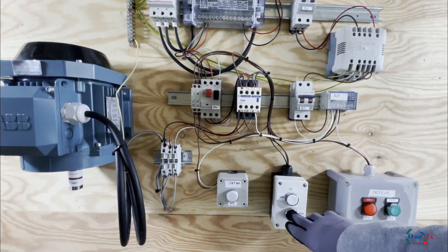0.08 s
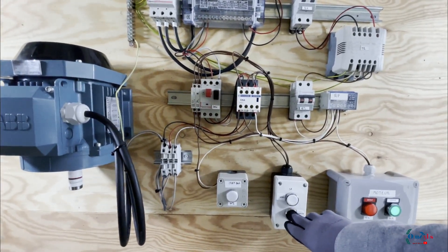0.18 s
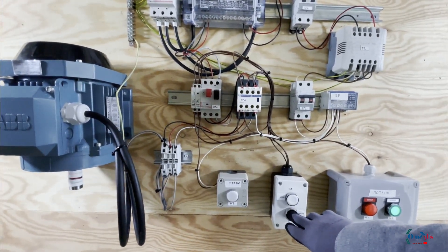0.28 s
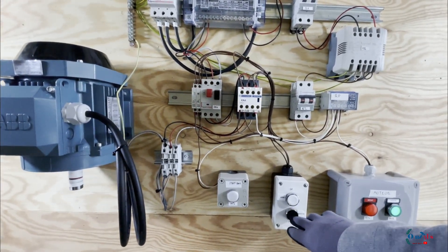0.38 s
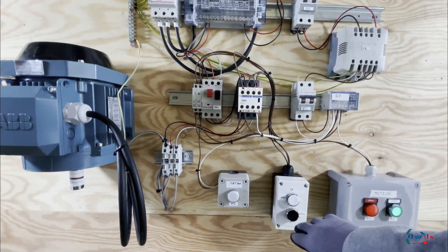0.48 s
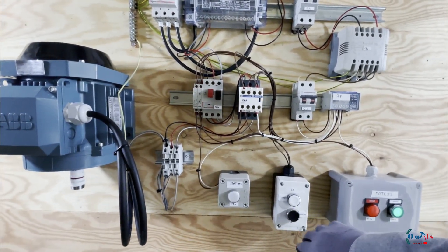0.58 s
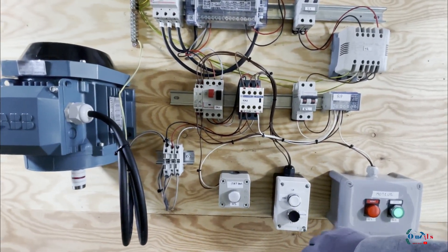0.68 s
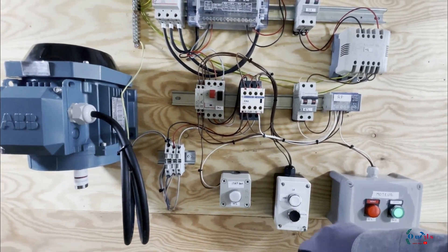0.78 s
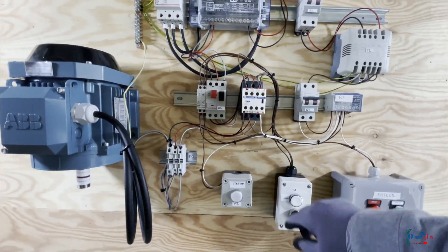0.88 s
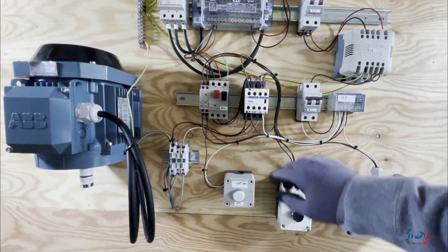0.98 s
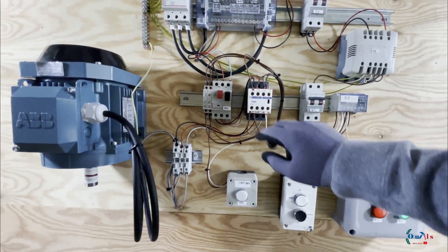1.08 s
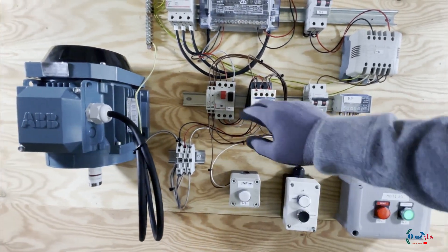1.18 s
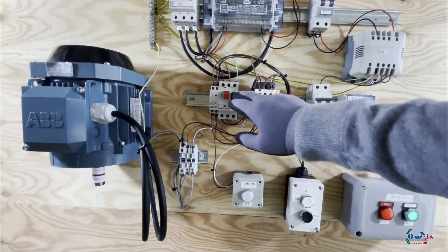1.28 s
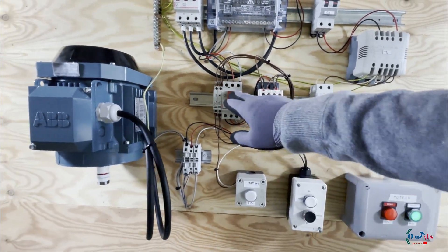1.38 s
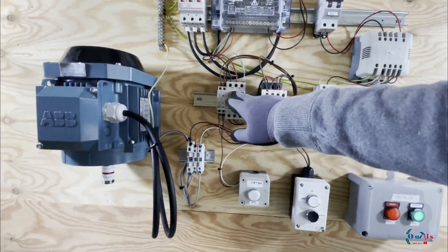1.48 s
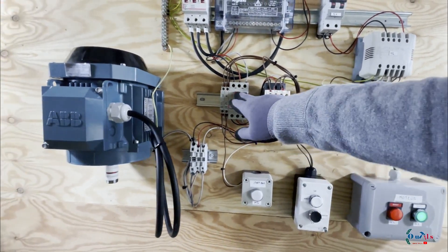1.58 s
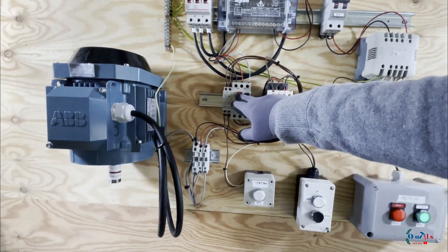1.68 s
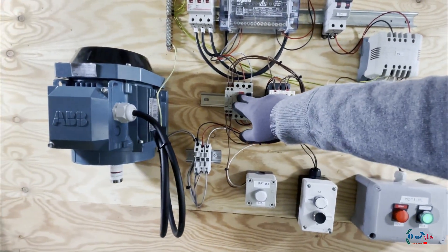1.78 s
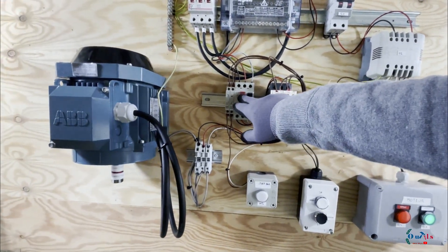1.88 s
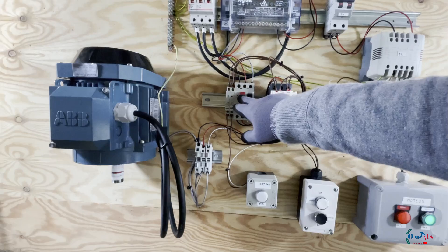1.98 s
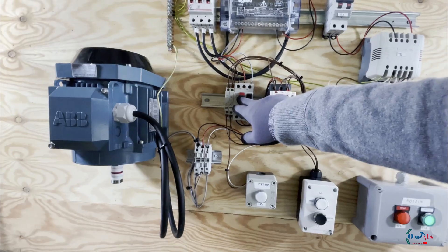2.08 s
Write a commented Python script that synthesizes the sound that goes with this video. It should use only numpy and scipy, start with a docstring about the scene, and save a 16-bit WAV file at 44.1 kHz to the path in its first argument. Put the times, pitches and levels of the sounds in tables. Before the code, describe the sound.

Close up in a small workshop, an electric motor is switched on: a faint button tick, a loud ringing contactor clack, a brief rattling shudder on a wooden panel, then a steady hum with a whine and airy hiss.

```python
"""Small workshop, close to a four-pole induction motor on a plywood panel. A button ticks, a contactor
clacks shut and its springs ring on. The inrush makes the motor shudder and rattle on the panel.
In a quarter second it is at speed and runs on with a low hum, a slot whine that beats once a turn,
and the hiss of its fan and bearings."""
import sys
import numpy as np
from scipy import signal
from scipy.fft import rfft, irfft
from scipy.io import wavfile
from scipy.ndimage import uniform_filter1d

SR = 44100
rng = np.random.default_rng(int(sys.argv[2]) if len(sys.argv) > 2 else 0)


def dump(signal):
    """Clip the signal to [-1, 1] and save it as 16-bit WAV at the path in sys.argv[1]."""
    limited = np.clip(np.atleast_2d(signal).T, -1, 1)
    pcm = np.round(limited * 32767).astype(np.int16)
    wavfile.write(sys.argv[1], SR, pcm)


N = 94815

MAINS_HZ, SHAFT_HZ = 50, 24.975
POWER_ON_S, RUN_UP_S = .23, .215
AT_SPEED_S = POWER_ON_S + RUN_UP_S

# Hum and slot whine. Each entry: a multiple of the shaft rate.
HUM_ORDERS = [3, 4, 5, 7, 8, 9, 11, 12]
WHINE_ORDERS = [30, 31, 34, 35, 36, 38, 56, 70, 130, 178]
# One tone per order. Each row: settled level in dB, left minus right in dB, left lead in radians.
HUM_TONES = [(-50, -1, 0), (-34.5, 1, 0), (-39, 4, .3), (-60.5, -5, 0.13), (-42, 4.5, 0.35),
             (-59.5, 6, 0.33), (-47.5, -3, 0.75), (-43.5, -6, 0.51)]
WHINE_TONES = [(-40.5, 6.5, -4), (-52, 17, 1.5), (-29, -6, -1.5), (-39, -7, 0), (-52, 9, 1),
               (-43, 8.5, -3.2), (-49.5, 4, 1.5), (-43, 1, -1.4), (-48, 2, -1.6), (-57.5, 23, 0.4)]
# End shield resonances. Each row: centre in Hz, half-width in Hz, level in dB, left minus right in dB.
BEARING_BANDS = [(1383, 53, -46, 12.5), (1884, 120, -47.5, -5.5), (2055, 50, -52, -4.5),
                 (3320, 88, -50, 14.5), (3525, 74, -48.5, 14), (3880, 110, -44.5, 2.5),
                 (4156, 250, -47.5, 5), (7200, 76, -57.5, 5)]
# Armature and contact bounces; jolts on the panel. Each row: start in seconds, relative level in dB.
CONTACT_BOUNCES = [(0.2161, -15.5), (.2202, -1), (.2215, 1), (.2243, -3.5), (.2257, 3.5), (.2277, -1)]
PANEL_JOLTS = [(.2155, -15.5), (.2335, -11.5), (.3245, -10), (.3395, -12), (.353, -14), (.3685, -11.5),
               (.3955, -8.5), (.4255, -9.5), (.4375, -11), (.456, -15), (.4905, -10)]
# Struck parts. Each row: frequency in Hz, relative level in dB, T60 in seconds.
CONTACTOR_MODES = [(2100, -13, 0.035), (2279, -14.5, 0.038), (2985, -17.5, 0.022), (3770, -14.5, 0.015),
                   (4840, -9, 0.072), (5470, -15, 0.027), (5780, -6, 0.029), (5870, -13.5, 0.03),
                   (7660, -12, .03), (7870, -14, 0.034), (9400, -19, 0.015), (11270, -8, 0.011)]
SPRING_MODES = [(3950, -45, 0.65), (4570, -43, .6), (5400, -37, .4), (5400, -45, 0.66), (5720, -35, 0.54),
                (6020, -34, 0.59), (7000, -39, 0.78), (7000, -36, 0.78), (7600, -29.5, 0.48),
                (7540, -33.5, .7), (8630, -35, 0.68)]
PANEL_MODES = [(66.1, -12, 0.37), (107, -15, 0.061), (153.7, 0, 0.18), (196, -4, 0.028), (251, -8, 0.146),
               (314, -10, 0.24), (326.7, -17.5, 0.29), (394, -25, 0.017)]
# Shudder strength. Each row: time in seconds, gain in dB.
SHUDDER_ENVELOPE = [(.2, -29.5), (.235, 1.5), (.29, -11), (.34, 4.5), (.42, 3.5), (.5, -3.5), (.525, -12),
                    (.62, -14), (.72, -19.5), (1.05, -27), (1.3, -22)]
# Housing rattles. Each row: peak time in seconds, Gaussian sigma in seconds, centre in Hz,
# half-width in Hz, level in dB, left minus right in dB.
RATTLE_BURSTS = [(0.267, 0.022, 805, 147, -24.5, 8), (0.355, 0.0086, 600, 556, -19, -3),
                 (0.386, 0.0083, 740, 463, -20.5, 4), (0.375, 0.049, 3330, 4070, -29, 4),
                 (0.403, 0.0042, 11000, 910, -33.5, -4), (0.422, 0.0029, 6050, 4000, -25.5, 3)]
# Noise spectra, before their envelopes. Each row: frequency in Hz, left in dB/Hz, right in dB/Hz,
# left-right correlation from -1 to 1.
RUSH_SPECTRUM = [(30, -73, -81, 0.88), (53.5, -54.5, -56.5, 1), (150, -63, -60.5, 0.97),
                 (312, -60.5, -64.5, 1), (479, -69.5, -68.5, 0.074), (736, -55.5, -70.5, 0.41),
                 (1117, -67, -66, 0.59), (1470, -61, -70.5, 0.82), (1640, -60.5, -61.5, 0.8),
                 (1980, -61, -63, 1), (2420, -70, -74.5, 0.87), (3200, -69.5, -72.5, 0.1),
                 (3980, -68.5, -74, 0.4), (5170, -71.5, -81, 0.27), (6450, -77.5, -87, 0.5),
                 (7800, -81.5, -84.5, 0.23), (9000, -76.5, -76.5, 0.15), (9600, -80, -81, 0.14),
                 (9350, -105, -105, 0.24), (10700, -101, -101, 0.54)]  # fan and bearings
CRACK_SPECTRUM = [(400, -67, -60, 1), (1150, -70, -71, .5), (2095, -45, -40.5, 1), (2540, -65, -53.5, 0),
                  (3440, -57, -52, 0.041), (4200, -57, -57, 0.57), (6000, -41, -39, 0), (6860, -46, -56, 0),
                  (7600, -37, -39, 0), (9860, -53, -46.5, 0.2), (12860, -59, -54, 0.42),
                  (15600, -67, -74, 0)]  # each contact bounce
TAIL_SPECTRUM = [(506, -59, -73, 0.045), (1390, -65, -77, 0.025), (2170, -60, -65, 0.049),
                 (2800, -72, -71, 0), (3700, -68, -69, 0), (4700, -58.5, -65, 0.3),
                 (6340, -54.5, -70, 0.074), (6370, -61, -79, 0.21), (7700, -56, -71, 0.16),
                 (8950, -58.5, -60, .2), (9800, -83, -82, .3), (12200, -59.5, -58, 0.026)]  # clack ringing in springs and room
RUMBLE_SPECTRUM = [(30, -66, -68, 0.38), (59, -38, -42.5, 1), (120, -36, -35.5, 0.96), (280, -46, -45.5, 1),
                   (450, -61, -56.5, 0.04), (930, -78, -66, 0.68)]  # shuddering motor
BUTTON_SPECTRUM = [(1000, -80, -89, .3), (2000, -67, -65, .3), (3500, -70, -81, .3), (5200, -74, -80, .3),
                   (7000, -95, -99, .3)]
WORKSHOP_SPECTRUM = [(29.6, -80, -59, 1.0), (56, -58.5, -56.5, 1.0), (140, -57.5, -59, 0.84),
                     (250, -73, -72.5, 0.98), (580, -69, -72, -0.96), (1170, -82.5, -90.5, -0.2),
                     (1890, -70.5, -75, -0.0093), (2500, -88.5, -93.5, 0.4), (3720, -75.5, -81, 0.72),
                     (5250, -90.5, -101.5, -0.32), (7200, -95.5, -100, 1), (8850, -87.5, -88, -0.57)]


def motor():
    """The shaft runs up evenly; hum, slot whine and rush follow its speed."""
    speed = np.clip(since(POWER_ON_S) / RUN_UP_S, 0, 1)
    shaft_hz = SHAFT_HZ * speed * (1 + 0.00049 * drift(rate_hz=6))
    shaft_rad = 2 * np.pi * np.cumsum(shaft_hz) / SR
    unsettled = np.exp(-since(AT_SPEED_S) / .55)
    swell = (undb(-6) * pan(1.5)) ** unsettled  # whine starts softer and further left
    hum = shaft_tones(HUM_ORDERS, HUM_TONES, shaft_rad, waver_db=-0.5)
    whine = swell * shaft_tones(WHINE_ORDERS, WHINE_TONES, shaft_rad, waver_db=0.5)
    return speed ** 2 * (hum + whine) + rush(speed, shaft_rad)


def shaft_tones(orders, levels, shaft_rad, waver_db):
    """Tones locked to the shaft, each wavering in level."""
    out = 0
    for order, (db, pan_db, lead_rad) in zip(orders, levels):
        phase_rad = order * shaft_rad + rng.uniform(0, 2 * np.pi) + np.array([[lead_rad], [0]])
        peak = np.sqrt(2) * undb(db + waver_db * drift(rate_hz=8.77))
        out = out + peak * pan(pan_db) * np.sin(phase_rad)
    return out


def rush(speed, shaft_rad):
    """Fan and bearing noise throbs once a turn and at twice mains rate; part rings in the cooling fins."""
    fin_share = 0.44
    fin_response = white() * decay(0, t60_s=0.34)
    fin_response /= np.sqrt((fin_response ** 2).sum(axis=1, keepdims=True))
    direct = np.sqrt(1 - fin_share) * white()
    ringing = np.sqrt(fin_share) * irfft(rfft(white()) * rfft(fin_response), N)
    air = from_left(colour(direct + ringing, RUSH_SPECTRUM, top_hz=12200))
    swell = undb(-2.5 * np.exp(-since(POWER_ON_S)))  # 1 s time constant
    throb = 1 + 0.067 * np.sin(shaft_rad) + 0.14 * np.sin(2 * np.pi * 2 * MAINS_HZ * since(0))
    return (air + bearings()) * speed * swell * throb


def bearings():
    """Rolling balls excite narrow resonances of the end shields."""
    return sum(noise_band(hz, width_hz) * undb(db + 0.8 * drift(rate_hz=7.1)) * pan(pan_db)
               for hz, width_hz, db, pan_db in BEARING_BANDS)


def contactor():
    """Armature and contacts bounce shut, a crack at each blow; the room rings on."""
    body = from_left(ring(CONTACT_BOUNCES, CONTACTOR_MODES, scatter=0.92) * pan(3.5)) * undb(-4)
    crack_power = sum((undb(db) * decay(start_s, t60_s=0.017)) ** 2 for start_s, db in CONTACT_BOUNCES)
    crack = colour(white(), CRACK_SPECTRUM) * np.sqrt(crack_power)
    shut_s = CONTACT_BOUNCES[-2][0]
    tail_gain = decay(shut_s, t60_s=0.83) + undb(-2) * decay(shut_s, t60_s=0.1)
    return body + crack + colour(white(), TAIL_SPECTRUM, top_hz=11300) * tail_gain


def springs():
    """The contactor's springs ring on after the hardest blow."""
    blow = [(CONTACT_BOUNCES[-2][0], 0)]
    return np.array([ring(blow, SPRING_MODES, scatter=0.65) for _ in range(2)]) * pan(3)


def shudder():
    """Starting torque pulses at twice mains rate and jolts the panel; the motor then sways on its feet."""
    sway_hz, sway_end_s, push_s = 70.1, 1.13, 0.0015
    t = since(0)
    strength = undb(np.interp(t, *np.array(SHUDDER_ENVELOPE).T))
    torque = strength * undb(-17.5) * np.sin(2 * np.pi * 2 * MAINS_HZ * t)
    settle = (1 - np.tanh((t - sway_end_s) / .05)) / 2
    sway_gain = undb(-23.5) * decay(AT_SPEED_S, t60_s=4.8) * settle
    sway = sway_gain * np.sin(2 * np.pi * sway_hz * since(AT_SPEED_S))
    thuds = smooth(ring(PANEL_JOLTS, PANEL_MODES), int(push_s * SR))
    rumble = strength * colour(white(), RUMBLE_SPECTRUM, top_hz=1460)
    return from_left(rumble + (torque + sway - thuds) * pan(1))


def rattles():
    """The housing rattles in short bursts during the run-up."""
    out = 0
    for peak_s, sigma_s, hz, width_hz, db, pan_db in RATTLE_BURSTS:
        burst = np.exp(-.5 * ((since(0) - peak_s) / sigma_s) ** 2)
        out = out + noise_band(hz, width_hz) * undb(db) * pan(pan_db) * burst
    return out


def button(press_s=.1212, attack_s=.002):
    """The start button ticks just before the contactor pulls in."""
    envelope = np.minimum(since(press_s) / attack_s, 1) * decay(press_s, t60_s=0.047)
    return colour(white() * envelope, BUTTON_SPECTRUM, top_hz=7500)


def workshop():
    """Steady room noise."""
    return colour(white(), WORKSHOP_SPECTRUM, top_hz=9260)


def ring(hits, modes, scatter=0.):
    """Struck modes; scatter varies their phase from blow to blow."""
    out, t = np.zeros(N), np.arange(SR) / SR
    waves = np.array([undb(db) * np.exp((2j * np.pi * hz - np.log(1000) / t60_s) * t)
                      for hz, db, t60_s in modes])
    phases_rad = scatter * rng.uniform(-np.pi, np.pi, (len(hits), len(modes)))
    for (start_s, db), phase_rad in zip(hits, phases_rad):
        i = int(start_s * SR)
        out[i:i + SR] += undb(db) * (np.exp(1j * phase_rad) @ waves).imag
    return out


def colour(pair, spectrum, top_hz=16000):
    """Give two independent signals a table's spectrum and left-right correlation."""
    bins_hz = np.arange(N // 2 + 1) * SR / N + 1
    hz, *columns = np.array(spectrum, float).T
    left_db, right_db, correlation = (np.interp(np.log(bins_hz), np.log(hz), c) for c in columns)
    mid, side = rfft(pair) * np.sqrt([(1 + correlation) / 2, (1 - correlation) / 2])
    shaped = np.array([(mid + side) * undb(left_db), (mid - side) * undb(right_db)])
    band_limit = 1 / np.sqrt((1 + (hz[0] / 2 / bins_hz) ** 8) * (1 + (bins_hz / top_hz) ** 60))
    return irfft(shaped * band_limit, N) * np.sqrt(SR / 2)


def noise_band(hz, width_hz):
    """Two independent noises in one Gaussian band, rms 1."""
    bins_hz = np.arange(N // 2 + 1) * SR / N
    noise = irfft(rfft(white()) * np.exp(-((bins_hz - hz) / width_hz) ** 2), N)
    return noise / noise.std()


def from_left(pair, lag_s=0.0003086):
    """Sound from the left reaches the right side later."""
    bins_hz = np.arange(N // 2 + 1) * SR / N
    right = irfft(rfft(pair[1]) * np.exp(-2j * np.pi * bins_hz * lag_s), N)
    return np.array([pair[0], right])


def white():
    """Two independent white noises."""
    return rng.standard_normal((2, N))


def drift(rate_hz):
    """Smooth random drift, spread near 1."""
    hold = int(SR / rate_hz)
    steps = np.repeat(rng.standard_normal(N // hold + 1), hold)
    return np.sqrt(2) * smooth(steps, hold)[:N]


def smooth(x, samples):
    """Moving average, applied twice."""
    return uniform_filter1d(uniform_filter1d(x, samples), samples)


def decay(start_s, t60_s):
    """Sudden onset, exponential decay."""
    age_s = since(start_s)
    return (age_s > 0) * np.exp(-np.log(1000) * age_s / t60_s)


def since(start_s):
    """Seconds since start_s, zero before."""
    return np.maximum(np.arange(N) / SR - start_s, 0)


def pan(db):
    """Stereo gains for a left minus right level."""
    return undb(np.array([[db], [-db]]) / 2)


def undb(db):
    """Decibels to gain."""
    return 10 ** (np.asarray(db) / 20)


def scene():
    """Button, contactor and starting motor over the room noise."""
    return button() + contactor() + springs() + shudder() + rattles() + motor() + workshop()


def record(dry, low_cut_hz=31.4, top_hz=15800):
    """The recorder thins the deepest bass, clips at full scale and cuts the top."""
    highpass = signal.butter(2, low_cut_hz, "high", fs=SR, output="sos")
    lowpass = signal.ellip(8, .1, 60, top_hz, fs=SR, output="sos")
    clipped = np.clip(signal.sosfiltfilt(highpass, dry), -1, 1)
    return signal.sosfiltfilt(lowpass, clipped)


dry = scene()
out = record(dry)
dump(out)
```